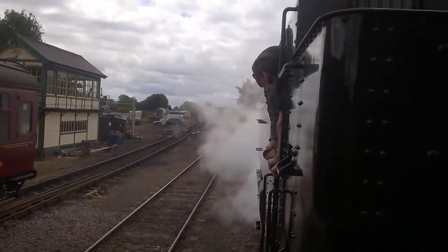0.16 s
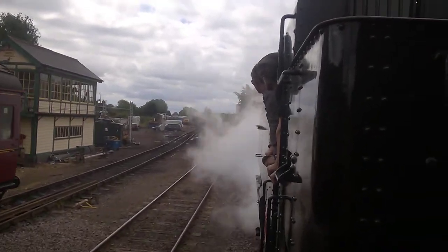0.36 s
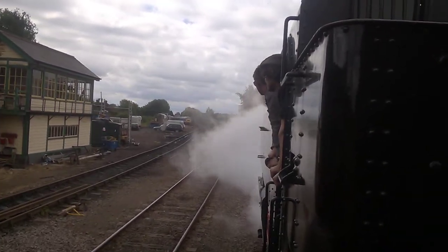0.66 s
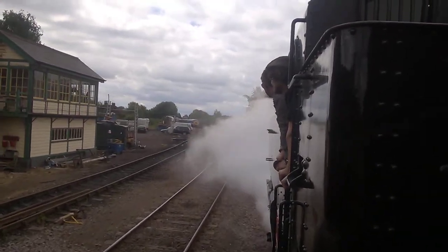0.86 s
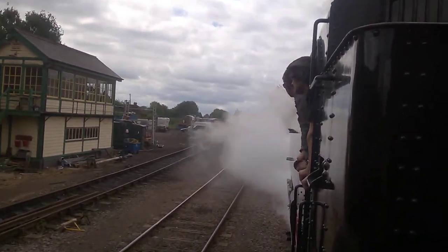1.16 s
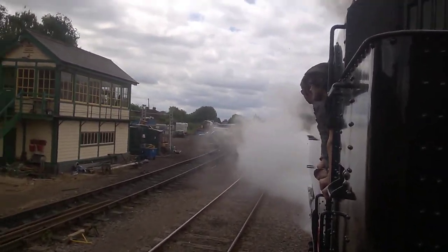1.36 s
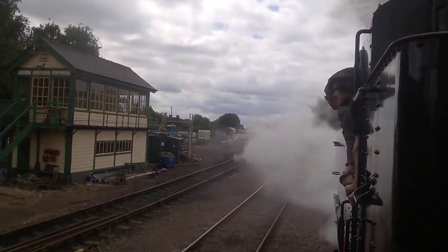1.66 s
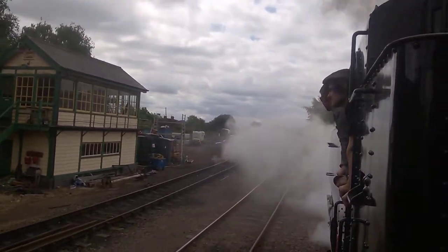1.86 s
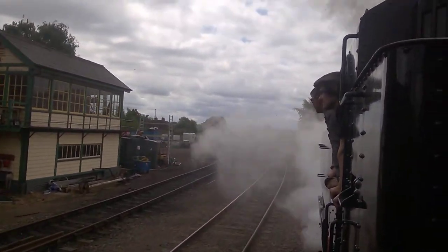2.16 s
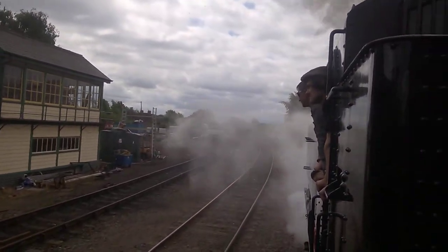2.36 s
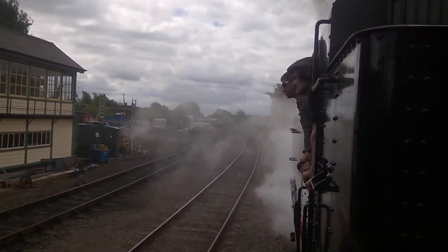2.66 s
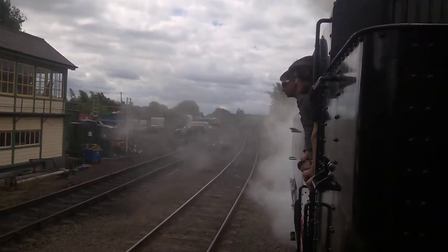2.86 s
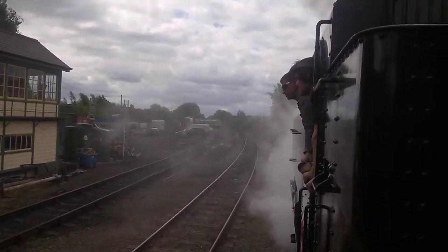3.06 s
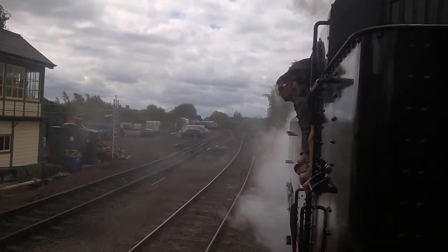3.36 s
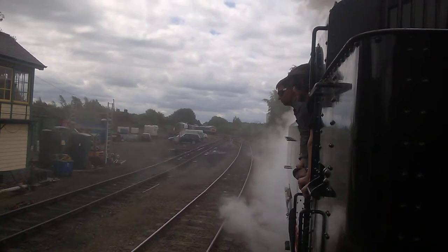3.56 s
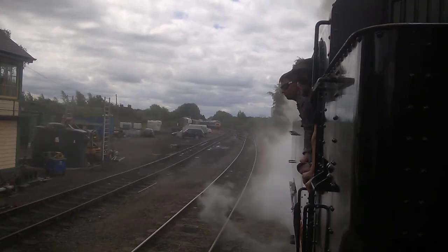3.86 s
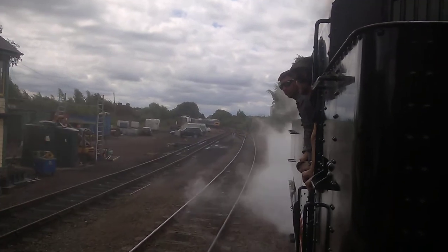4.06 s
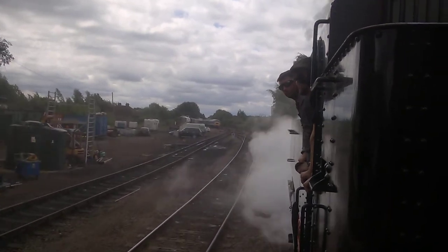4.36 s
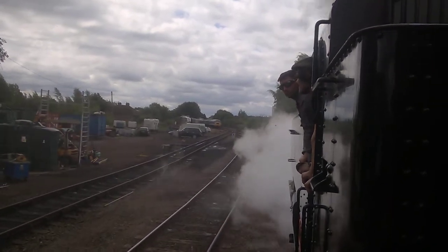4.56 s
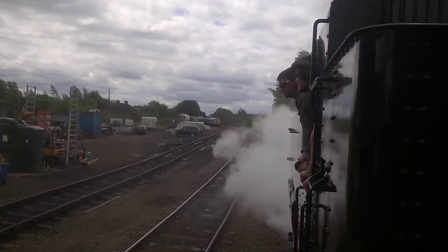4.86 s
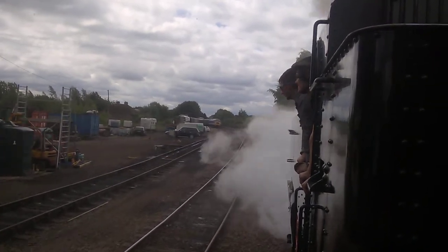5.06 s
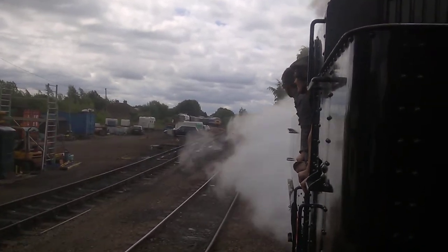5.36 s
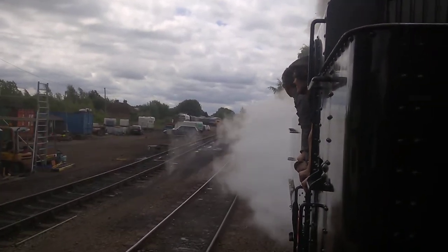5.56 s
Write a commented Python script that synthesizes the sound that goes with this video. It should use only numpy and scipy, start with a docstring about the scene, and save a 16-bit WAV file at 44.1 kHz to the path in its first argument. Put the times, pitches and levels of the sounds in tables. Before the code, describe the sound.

Drain steam hisses continuously, fluttering and swelling a little, with a thin whistling edge strongest around the middle. Low breathy chimney chuffs pulse underneath, uneven in accent, harder in the last second or so. Steam washes over stones, wheels rumble, and running gear knocks occasionally. The microphone is on the train just behind the cab, in an open yard; the image is narrow and central.

```python
"""Slow steam locomotive in a station yard

Heard from just behind the cab: open drain cocks hiss throughout as coloured noise with a faint whistle.
The chimney chuffs softly about three times a second, a little faster and harder towards the end: gated noise.
Steam washes the ballast and wheels rumble as drifting noise, a rail sings faintly as resonant noise,
and the running gear knocks now and then with damped sine pairs."""
import sys
import numpy as np
from scipy import signal
from scipy.fft import rfft, irfft, next_fast_len
from scipy.io import wavfile
from scipy.ndimage import uniform_filter1d

SR = 44100
rng = np.random.default_rng(int(sys.argv[2]) if len(sys.argv) > 2 else 0)


def to_wav(s):
    """Save 16-bit WAV."""
    ch = np.atleast_2d(s).T  # columns
    pcm = np.round(np.clip(ch, -1, 1) * 32767)  # PCM
    wavfile.write(sys.argv[1], SR, pcm.astype(np.int16))


N = 251811
TIME = np.arange(N) / SR

# how hard the engine works: time_s [s], blast_db [dB, before accents and layer levels]
EFFORT_CURVE = [(0, -45), (1.3, -44.5), (1.7, -45), (2.6, -45.5), (3.2, -44), (3.9, -44.5), (4.7, -41.5),
                (5.71, -42.5)]
CRUISE_DB = -44  # the effort at which the blast length and the rolling level have their base values


def undb(db):
    """Decibels to gain."""
    return 10 ** (np.asarray(db) / 20)


def curves(table):
    """The columns of a table, joined by straight lines in time."""
    time_s, *columns = np.transpose(table)
    return [np.interp(TIME, time_s, column) for column in columns]


def noise(gain):
    """Noise of rms 1 whose spectrum is the function gain(Hz)."""
    size = next_fast_len(N)
    hz = np.maximum(np.fft.rfftfreq(size, 1 / SR), 1)
    spectrum = rfft(rng.standard_normal(size)) * gain(hz)
    x = irfft(spectrum, size)[:N]
    return x / x.std()


def turbulence(colour):
    """Noise with the colour of (Hz, dB) points, falling 24 dB per octave beyond them."""
    point_hz, point_db = np.transpose(colour)

    def gain(hz):
        octaves_outside = np.abs(np.log2(hz / np.clip(hz, point_hz[0], point_hz[-1])))
        inside_db = np.interp(np.log(hz), np.log(point_hz), point_db)
        return undb(inside_db - 24 * octaves_outside)

    return noise(gain)


def resonant(modes):
    """Noise ringing in (Hz, width Hz, dB) resonances."""
    def gain(hz):
        return sum(undb(db) / (1 + ((hz - at) / width) ** 2) for at, width, db in modes)

    return noise(gain)


def walk(rate_hz):
    """Random levels held for 1 / rate_hz and smoothed twice; spread 1."""
    hold = max(int(SR / rate_hz), 2)
    steps = np.repeat(rng.standard_normal(N // hold + 1), hold)
    x = uniform_filter1d(uniform_filter1d(steps, hold), hold)[:N]
    return x / x.std()


def strokes():
    """Piston strokes counted over time; the beat quickens evenly as the train gathers speed."""
    first_beat_s, beats_per_s, beats_per_s2 = -0.01, 2.965, 0.1229
    t = TIME - first_beat_s
    return beats_per_s * t + beats_per_s2 * t ** 2 / 2


def ground_bounce(x, lag_s, sway, share):
    """Add the reflection from the track bed; its path changes as the engine sways."""
    late = TIME - lag_s * (1 + sway * walk(2.04))
    return (x + share * np.interp(late, TIME, x, left=0)) / np.sqrt(1 + share ** 2)


def drain_cocks(flutter_db=0.54, billow_db=0.35, spit_db=0.33, jet_db=0.24, roar_trim_db=-0.42,
                spray_trim_db=0.27, surge_db=0.4, surge_at_stroke=0.77):
    """Wet steam: a sharp, faintly whistling jet with fine spray, and a lower roar where it breaks into a cloud."""
    # drain steam: time_s [s], flow_db [dB, before surge and flutter],
    # roar_db [dB re flow, before trim], spray_db [dB re flow, before trim]
    drain_flow = [(0.0, -29, -1, -0.5), (0.09, -33, 1.5, 0), (0.16, -30.5, -0.5, -3), (0.21, -33, 1.5, 0),
                  (0.65, -33.5, 0.5, -1), (0.97, -31, 0, 1), (1.13, -34, 0.5, 0), (1.16, -31.5, 0.5, 0),
                  (1.92, -36, 0, -2), (2.15, -34.5, -0.5, -2), (2.35, -35, -1.5, -2), (2.77, -33.5, 0, -2),
                  (2.94, -35.5, 2, 0), (3.44, -31, -2, -2.5), (3.54, -28.5, -5.5, 1),
                  (3.64, -30.5, -0.5, -1.5), (4.12, -30, 0, -3), (4.42, -32.5, 0, -3),
                  (4.66, -29.5, -1, -2.5), (5.14, -31, 1, -0.5), (5.47, -35, 1, -1.5),
                  (5.71, -33, -0.5, -1.5)]
    # whistling edge of the jet: time_s [s], whistle_db [dB re flow, before power sharing]
    whistle_curve = [(0, -13), (2, -9), (3, -1), (3.9, -4.5), (5.71, -18)]
    # whistle resonances: pitch_hz [Hz], width_hz [Hz], level_db [dB, relative]
    whistle_modes = [(2387, 110, -1), (2820, 67, -17), (3290, 224, 1.5), (7220, 220, -1.5), (7930, 136, 1),
                     (10980, 150, -7)]
    # noise colours of jet, spray and cloud: pitch_hz [Hz], density_db [dB per Hz, relative]
    jet_colour = [(4500, -21), (5500, -13), (6100, -7), (6600, -2), (7100, -0.9), (8100, -0.5), (8700, -1),
                  (9400, -7.5), (10500, -47), (13000, -32)]
    spray_colour = [(8000, -52), (9300, -4.5), (10000, 0.5), (10500, 1.5), (11200, -2), (11800, -7),
                    (12500, -9.5), (14000, -10.5), (16000, -11.5)]
    roar_colour = [(900, -11), (1300, -17.5), (1600, -4), (1950, -0.5), (2400, -1), (2780, 0), (2980, -3.5),
                   (3330, -0.5), (3750, -2.5), (4150, -3.5), (4700, -8), (5000, -7.5), (5500, -18),
                   (7000, -28)]

    flow_db, roar_db, spray_db = curves(drain_flow)
    whistle_db, = curves(whistle_curve)
    # cylinder pressure peaks once a stroke
    flow_db = flow_db + surge_db * np.cos(2 * np.pi * (strokes() - surge_at_stroke))
    jet = undb(jet_db) * turbulence(jet_colour)
    spray = undb(spray_db + spray_trim_db) * turbulence(spray_colour)
    nozzle = (jet + spray) * undb(spit_db * walk(600))  # water in the steam makes the jet spit
    cloud = undb(roar_db + roar_trim_db + billow_db * walk(24.86)) * turbulence(roar_colour)
    whistle = undb(whistle_db)
    # the whistle draws its power from the steam: all of it is turned down as the whistle grows
    steam = (nozzle + cloud + whistle * resonant(whistle_modes)) / np.sqrt(1 + whistle ** 2 / 2)
    fluttering = steam * undb(flow_db + flutter_db * walk(30))
    return ground_bounce(fluttering, lag_s=.003, sway=0.037, share=.11)


def ballast_wash(wash_trim_db=2.03, eddy_db=1.26):
    """The spent steam rushes over the stones: coloured noise with randomly eddying level."""
    # steam sweeping the ballast: time_s [s], level_db [dB, before trim and eddies]
    wash_curve = [(0, -43), (.6, -46), (1.2, -45), (2.1, -55.5), (3.7, -53.5), (4.1, -44), (4.5, -50.5),
                  (5.28, -42), (5.55, -50.5)]
    # its colour: pitch_hz [Hz], density_db [dB per Hz, relative]
    ballast_colour = [(250, -3), (550, -9), (700, -9.5), (830, -11), (1050, 0), (1400, 5.5), (1800, 1.5),
                      (2600, -24)]

    level_db, = curves(wash_curve)
    return turbulence(ballast_colour) * undb(level_db + wash_trim_db + eddy_db * walk(20))


def exhaust(rise_s=0.021, fall_s=0.027, body_db=-3, hollow_db=-3.2, rasp_db=-2, ragged_db=0.6):
    """Each valve opening sends a ragged blast up the chimney: a hollow body and a rasp that die once it shuts."""
    # the four beats of one wheel turn: accent_db [dB], bright_db [dB, rasp re body, before build-up and levels]
    wheel_turn = [(1.5, -10.5), (-1, 0.5), (1, -6.5), (-0.2, -4)]
    # blast colours of body and rasp: pitch_hz [Hz], density_db [dB per Hz, relative]
    chimney_colour = [(20, -14), (36, -7), (60, -7), (100, -4), (150, 1), (190, 4), (250, -3), (360, -5),
                      (460, -8), (700, -9.5)]
    rasp_colour = [(300, 6.5), (480, -8), (570, -4.5), (650, 5), (720, -4), (830, 4.5), (1050, -4.5),
                   (1600, -18), (3500, -18)]
    # hollow resonances of the chimney: pitch_hz [Hz], width_hz [Hz], level_db [dB, relative]
    chimney_modes = [(157, 9.2, -1.5), (192, 16, 5.5), (194, 9.4, -17), (253, 14, -10.5), (336, 13, -9),
                     (378, 23, -14)]
    cruise_open_s, open_s_per_db = .07, .007  # harder work holds the valve open longer
    rasp_db_per_beat = .2  # the rasp sharpens from beat to beat as the engine speeds up

    body, rasp = np.zeros(N), np.zeros(N)
    stroke = strokes()
    effort_db, = curves(EFFORT_CURVE)
    for beat in range(int(stroke[-1]) + 1):
        start_s = np.interp(beat, stroke, TIME)
        beat_db = np.interp(beat, stroke, effort_db)
        accent_db, bright_db = wheel_turn[beat % len(wheel_turn)]
        open_s = cruise_open_s + open_s_per_db * (beat_db - CRUISE_DB)
        age = TIME - start_s
        attack = np.clip(age / rise_s, 0, 1)
        decay = np.exp(-np.maximum(age - open_s, 0) / fall_s)
        blast = undb(beat_db + accent_db) * attack * decay
        body += blast
        rasp += blast * undb(bright_db + rasp_db_per_beat * beat)
    body_gas = body * undb(body_db) * turbulence(chimney_colour)
    rasp_gas = rasp * undb(rasp_db) * turbulence(rasp_colour)
    ragged_gas = (body_gas + rasp_gas) * undb(ragged_db * walk(90))
    return ragged_gas + body * undb(hollow_db) * resonant(chimney_modes)


def wheels(roll_db=-52.0, roll_per_effort=.9, jolt_db=2.5, waver_db=3.0, thrust_db=2, lead_strokes=0.023):
    """Wheels rumble over uneven track, harder with effort and thrust; flanges rub the rail into a faint ring."""
    # the rail singing under the flanges: time_s [s], level_db [dB, before waver]
    rail_curve = [(0, -48), (.5, -48), (1.1, -55), (3.6, -68), (5.71, -51.5)]
    # resonances of the rail: pitch_hz [Hz], width_hz [Hz], level_db [dB, relative]
    rail_modes = [(817, 63, 2), (890, 110, -7)]
    # a deep rumble that comes and goes: time_s [s], level_db [dB]
    boom_curve = [(0, -60), (.7, -61), (1.2, -75), (3.4, -71), (3.7, -55), (4.2, -52.5), (4.5, -61),
                  (4.8, -55), (5.3, -70)]
    # colours of deep and rolling rumble: pitch_hz [Hz], density_db [dB per Hz, relative]
    boom_colour = [(28, -3), (75, 0), (110, -2)]
    rumble_colour = [(15, -12), (35, -4), (80, -4), (130, 1), (230, -2), (380, -1), (560, -6.5), (800, -2),
                     (1500, -32)]

    effort_db, = curves(EFFORT_CURVE)
    rub_db, = curves(rail_curve)
    boom_db, = curves(boom_curve)
    rolling_db = roll_db + roll_per_effort * (effort_db - CRUISE_DB)
    piston_db = thrust_db * np.sin(2 * np.pi * (strokes() + lead_strokes))
    rumble = turbulence(rumble_colour) * undb(rolling_db + piston_db + jolt_db * walk(28))
    deep = turbulence(boom_colour) * undb(boom_db)
    singing_rail = resonant(rail_modes) * undb(rub_db + waver_db * walk(18))
    return rumble + deep + singing_rail


def running_gear(contact_s=0.0017, overtone=1.55, overtone_db=-7):
    """Slack in rods and couplings is taken up with dull knocks, each two quickly damped modes."""
    # knocks: start_s [s], pitch_hz [Hz, lower mode], level_db [dB, lower mode before decay], t60_s [s]
    knock_list = [(1.461, 315, -34, 0.068), (1.541, 467, -35.5, 0.047), (1.684, 250, -38, .04),
                  (2.781, 240, -32, 0.081), (2.905, 195, -33, .045), (3.483, 276, -32, 0.083),
                  (4.345, 94, -38, .087), (5.059, 80, -40, .086)]

    out = np.zeros(N)
    for start_s, pitch_hz, level_db, t60_s in knock_list:
        age = np.maximum(TIME - start_s, 0)
        phase = 2 * np.pi * pitch_hz * age
        ring = np.sin(phase) + undb(overtone_db) * np.sin(overtone * phase)
        attack = np.minimum(age / contact_s, 1)
        decay = np.exp(-np.log(1000) * age / t60_s)
        out += undb(level_db) * attack * decay * ring
    return out


def scene():
    """Everything comes from straight ahead, alike in both ears."""
    engine = drain_cocks() + ballast_wash() + exhaust() + wheels() + running_gear()
    return np.array([engine, engine])


def record(dry):
    """A steep elliptic low-pass removes the top treble."""
    top_hz = 15800
    low_pass = signal.ellip(12, .1, 80, top_hz, fs=SR, output="sos")  # order, ripple dB, stopband dB
    return signal.sosfilt(low_pass, dry)


dry = scene()
out = record(dry)
to_wav(out)
```